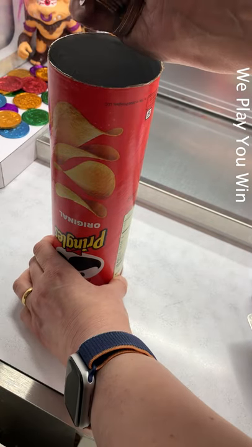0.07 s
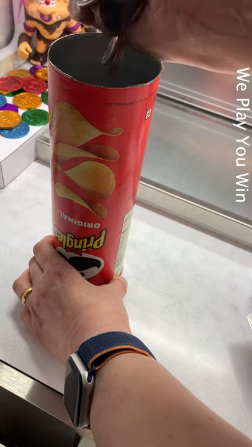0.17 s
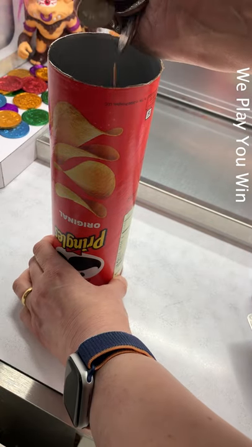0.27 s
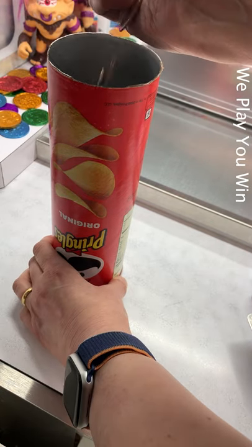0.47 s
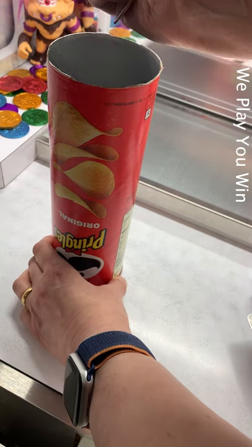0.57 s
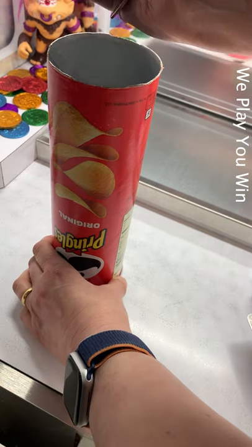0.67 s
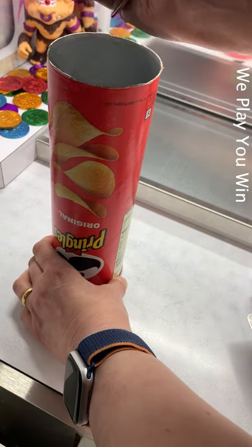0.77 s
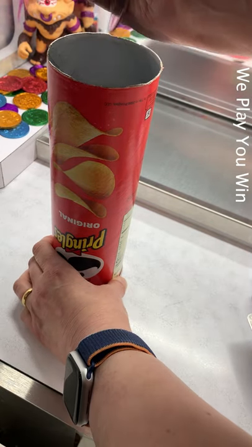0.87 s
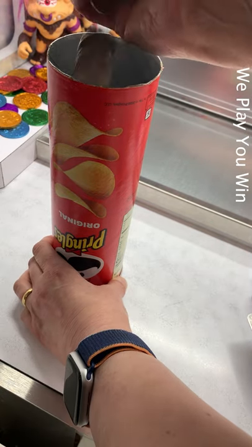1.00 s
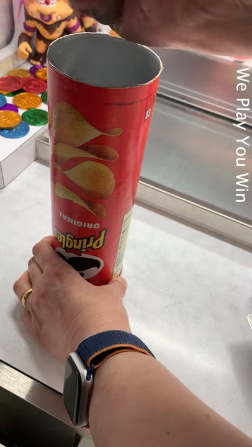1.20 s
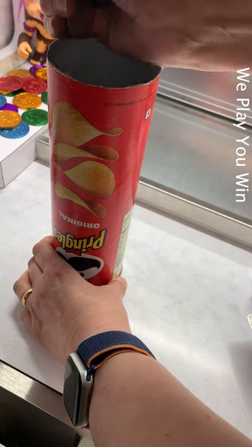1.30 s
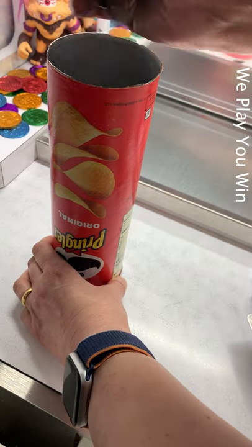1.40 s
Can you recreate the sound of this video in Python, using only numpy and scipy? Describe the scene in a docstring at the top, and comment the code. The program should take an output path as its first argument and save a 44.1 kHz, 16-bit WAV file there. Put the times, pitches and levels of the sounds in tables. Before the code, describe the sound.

Metal coins slide from a cup and pour into a tall cardboard can, jingling brightly and battering its metal base. After a brief pause, a second, duller handful clatters onto the heap. Close by, indoors, over a faint hum.

```python
"""Coins poured from a cup into a tall cardboard can with a metal base, held on a counter.
Faint hum throughout. Coins scuff, tick and slide in the cup; from 0.25 s they clink and ring in their
bending modes as they stream out. From 0.34 s they batter the base and excite the can's resonances.
The can is nudged on the counter. At 0.79 s the stream stops dead: the heap damps the ringing.
Short pause, one thin tick. From 0.98 s a second, duller handful clatters in and sounds the hollow tube."""
import sys
import numpy as np
from scipy import signal
from scipy.fft import rfft, irfft, next_fast_len
from scipy.io import wavfile
from scipy.ndimage import uniform_filter1d, minimum_filter1d

SR = 44100
rng = np.random.default_rng(int(sys.argv[2]) if len(sys.argv) > 2 else 0)


def inscribe(sig):
    """Save sig as 16-bit PCM at rate SR to the path in sys.argv[1].

    A 1-D sig is mono; a 2-D sig holds one channel per row.
    Samples are clipped to [-1, 1] before scaling.
    """
    pcm = np.round(np.clip(np.atleast_2d(sig).T, -1, 1) * 32767)
    wavfile.write(sys.argv[1], SR, pcm.astype(np.int16))


N = 63945
T = np.arange(N) / SR

# Table levels are relative. Spectra are normalised in colour().
# machine hum lines [f/Hz, level/dB]
HUM_LINES = [(97, -80.5), (161, -72.5), (275, -65.5), (555, -70.5)]
# spectra of room noise and of the hand on the cup [f/Hz, level/dB]
AIR_SPECTRUM = [(30, -21), (65, -25), (130, -6), (350, -0.5), (650, -9.5), (1200, -14),
                (4000, -31), (15000, -36)]
HAND_SPECTRUM = [(25, -13), (80, 12), (200, -1), (700, -17), (3500, -9.5), (15000, -54)]

# loose coins scuff in the cup [t/s, level/dB]
SCUFFS = [(0.0225, -41), (0.0645, -35.5)]
# light ticks in the cup [t/s, level/dB]
TICKS = [(0.0222, -49.5), (0.0645, -34), (0.1335, -17.5), (0.157, -18), (0.1815, -25), (0.199, -9.5),
         (0.2285, -10), (0.244, -4), (0.270, -16.5)]
# coins slide over each other [t/s, level/dB]
SLIDE_CURVE = [(0.105, -55.5), (0.129, -49.5), (0.247, -29.5), (0.569, -30), (0.597, -63), (0.613, -21),
               (0.785, -23.5)]
# sliding contact [f/Hz, level/dB]
SLIDE_SPECTRUM = [(300, -42), (1000, -29.5), (2000, -6), (2900, -7), (4500, 2), (7300, -2.5), (9500, 2.5),
                  (12500, 2.5), (15800, -12)]
# cup rings more as coins reach its lip [t/s, level/dB]
CUP_RING_CURVE = [(0.105, -57), (0.133, -51), (0.295, -45.5), (0.315, -37), (0.335, -42), (0.39, -38)]

# ringing of the stream [t/s, level/dB]
JINGLE_CURVE = [(0.19, -51), (0.25, -25.5), (0.49, -23.5), (0.785, -18.5)]
# coin strikes coin [t/s, level/dB]
CLINKS = [(0.2511, -4), (0.2683, -10), (0.3173, -16), (0.3724, 0), (0.3818, -6.5), (0.4229, -4),
          (0.4426, -4.5), (0.4653, 2.5), (0.4792, 2), (0.5079, 2.5), (0.5226, -1), (0.5501, 0),
          (0.605, 0.5), (0.6131, 1.5), (0.6234, -14), (0.6424, 4), (0.6599, 0.5), (0.6824, 5), (0.6974, 0),
          (0.7102, -2), (0.7224, -1.5), (0.7538, -10), (0.7844, -1.5)]
# two bending modes, varying from coin to coin [f/Hz, level/dB]
COIN_MODES = [(8733, -5.5), (8775, -9), (8831, -5), (9170, -4.5), (9265, -5), (9480, -3.5), (14690, 2),
              (14880, -1.5), (15020, 5), (15092, 5.5), (15190, -2.5), (15273, -17)]

# single coins land on the base [t/s, level/dB]
LANDINGS = [(0.3395, -24), (0.3665, -19), (0.4003, -2.5), (0.4045, -6.5), (0.4335, -12.5), (0.4425, -13),
            (0.486, -6), (0.5055, -14), (0.523, -14.5), (0.5425, -8), (0.556, -12.5), (0.5885, -7.5),
            (0.628, -9), (0.647, -8.5), (0.680, -5.5), (0.7635, -12.5)]
# stream churns on the base [t/s, level/dB]
CHURN_CURVE = [(0.345, -37.5), (0.395, -38.5), (0.399, -26.5), (0.59, -27), (0.785, -28.5)]
# contact with the base [f/Hz, level/dB]
BASE_SPECTRUM = [(40, -34), (110, -6), (230, 1), (310, -6.5), (410, -2), (900, 2.5), (1600, 2.5), (3000, 3),
                 (5400, 0.5), (7500, -8), (15000, -13.5)]
# can resonances, base struck [f/Hz, base width/Hz, gain/dB]
BASE_MODES = [(111.5, 8.8, 12.5), (155.5, 15, 6.5), (224, 11, 6), (412, 25.4, 14), (554, 24, 0.5),
              (1441, 18.3, 0), (1613, 116, -2), (2880, 46, 1), (3392, 40, -0.5), (4774, 41, -2)]
# can nudged on the counter [t/s, level/dB]
BUMPS = [(0.648, -26.5), (1.145, -46.5)]

# heap shifts after the stream stops [t/s, level/dB]
SHIFT_CURVE = [(0.789, -27.5), (0.846, -37), (0.889, -75)]
# coins drop on the heap [t/s, level/dB]
DROPS = [(0.8018, -14), (0.8235, -16), (1.0024, -13.5), (1.0368, -12.5), (1.0725, -5), (1.0912, -3.5),
         (1.1325, -10.5), (1.1389, -4), (1.1767, -8), (1.2065, -14.5), (1.2755, -17), (1.3025, -12),
         (1.3974, -16), (1.4092, -14.5)]
# second handful settles: two curves, each [t/s, level/dB]
SETTLE_CURVES = [
    [(0.95, -60), (0.968, -54), (0.986, -30), (1.025, -25.5), (1.05, -28), (1.15, -26), (1.27, -34.5),
     (1.315, -28), (1.35, -53.5)],
    [(1.362, -26.5), (1.382, -32.5), (1.41, -29), (1.45, -41)],
]
# contact with the heap [f/Hz, level/dB]
HEAP_SPECTRUM = [(50, -43), (170, -21.5), (280, -6.5), (760, -6.5), (1300, -4.5), (3000, 0), (3900, 2),
                 (7000, 3), (12000, 6), (15800, 2)]
# edge-first hits on the heap [t/s, level/dB]
CRACKS = [(0.9812, -7), (1.0998, -6.5), (1.2337, -2.5), (1.2843, -10), (1.3583, -7), (1.3886, -13)]
# edge-first contact [f/Hz, level/dB]
CRACK_SPECTRUM = [(400, -23), (2770, -5), (4100, 3.5), (6000, 1), (12500, 0.5), (16000, -4.5)]
# heavy coins shake the can, both pours [t/s, level/dB]
KNOCKS = [(0.340, -15.5), (0.367, -19), (0.984, -19.5), (1.037, -31), (1.076, -17.5), (1.094, -16),
          (1.146, -33), (1.237, -15), (1.362, -19)]
# heavy contact [f/Hz, level/dB]
KNOCK_SPECTRUM = [(25, -18), (70, -12), (150, -1), (350, 1.5), (700, 0), (1050, -1.5), (1500, -7),
                  (3000, 1.5), (15000, -57)]
# can resonances, heap inside [f/Hz, base width/Hz, gain/dB]
TUBE_MODES = [(272.4, 14, 10), (397, 54, 8), (565.7, 33, 13), (985, 67, 13), (1047, 31, 14),
              (1372, 43, 9.5), (1730, 270, 1.5), (2341, 16, 6), (2610, 51, -0.5), (3440, 74, 2.5),
              (3900, 41, 6)]

CONTACT_T60_S, SIZE_SPREAD_DB = 0.0036, 5
CUP_HZ, CUP_T60_S, SLIDES_PER_S = 2356, 0.016, 900
COIN_T60_S, COIN_SPREAD_HZ, BOUNCE_S = 0.083, 82, 0.004
STOP_S, CHOKE_T60_S = 0.789, 0.025
LANDING_BAND_HZ, EXTRA_WIDTH_HZ = (1120, 10400), 12
SETTLES_PER_S, SETTLE_T60_S = 1200, 0.029
GRAZE_S, GRAZE_HIGHPASS_HZ = 0.9415, 6000
SHIMMER_BAND_HZ = (5500, 15000)
ROOM_DB, ROOM_T60_S, ROOM_DELAY_S, ROOM_LOWPASS_HZ = -17, 0.13, 0.004, 3500
LIMIT_DB, ATTACK_S, RELEASE_DB_PER_S, CUTOFF_HZ = -5, 0.0015, 598.5, 16000


def from_db(db):
    """Decibels to gain."""
    return 10 ** (np.asarray(db) / 20)


def level(curve):
    """Gain along a level curve; fast fade outside it."""
    t_s, db = np.transpose(curve)
    outside_s = np.maximum(t_s[0] - T, 0) + np.maximum(T - t_s[-1], 0)
    return from_db(np.interp(T, t_s, db) - 6000 * outside_s)


def colour(x, spectrum):
    """Minimum-phase filter, unit power gain."""
    size = 2 * next_fast_len(N)
    hz, db = np.transpose(spectrum)
    bins_hz = np.arange(size // 2 + 1) * SR / size
    gain = from_db(np.interp(np.log(bins_hz + 1), np.log(hz), db))
    cepstrum = irfft(np.log(gain / np.sqrt(np.mean(gain ** 2))))
    cepstrum[1:size // 2] *= 2
    cepstrum[size // 2 + 1:] = 0
    return irfft(rfft(x, size) * np.exp(rfft(cepstrum)))[:N]


def strikes(rows):
    """One click per row [t/s, level/dB]."""
    t_s, db = np.transpose(rows)
    clicks = np.zeros(N)
    clicks[np.clip((t_s * SR).astype(int), 0, N - 1)] = from_db(db)
    return clicks


def chatter(per_s):
    """Uneven run of small collisions, mixed sizes; rms 1."""
    gaps, signs, sizes = rng.random((3, 4000))
    at = (np.cumsum(2 * gaps) / per_s * SR).astype(int)
    sizes_db = SIZE_SPREAD_DB * np.minimum(-np.log(sizes), 3)
    heights = np.sign(signs - .5) * from_db(sizes_db)
    clicks = np.zeros(N)
    clicks[at[at < N]] = heights[at < N]
    return clicks / np.std(clicks)


def buzz(clicks, t60_s):
    """Each click becomes a dying burst of tiny contacts, energy preserved."""
    decay = from_db(-120 / (t60_s * SR))
    power = signal.lfilter([1 - decay], [1, -decay], clicks ** 2 + 1e-18)
    return np.sqrt(power) * rng.standard_normal(N)


def clatter(clicks, t60_s, tail_db):
    """Hard contact, then a tail of loose coins buzzing."""
    return buzz(clicks, CONTACT_T60_S) + from_db(tail_db) * buzz(clicks, t60_s)


def rattle(curve, per_s, t60_s, tail_db):
    """Dense collisions along a level curve."""
    collisions = clatter(chatter(per_s), t60_s, tail_db)
    return level(curve) * collisions / np.std(collisions)


def ring(clicks, hz, t60_s):
    """One damped mode; a unit click starts a unit sine."""
    radius = from_db(-60 / (t60_s * SR))
    angle = 2 * np.pi * hz / SR
    poles = [1, -2 * radius * np.cos(angle), radius ** 2]
    return signal.lfilter([0, np.sin(angle)], poles, clicks + 1e-18)


def background():
    """Machine hum, room noise, and hand rumble on the cup until the stream stops."""
    hum = sum(from_db(db) * np.sqrt(2) * np.sin(2 * np.pi * (hz * T + rng.random()))
              for hz, db in HUM_LINES)
    hand = level([(0, -64), (STOP_S, -64)]) * colour(rng.standard_normal(N), HAND_SPECTRUM)
    air = from_db(-64) * colour(rng.standard_normal(N), AIR_SPECTRUM)
    return hum + hand + air


def cup():
    """Coins scuff, tick and slide to the lip; the cup wall rings."""
    slide = from_db(0.5) * rattle(SLIDE_CURVE, SLIDES_PER_S, t60_s=0.036, tail_db=6.5)
    ticks = from_db(1) * clatter(strikes(TICKS), t60_s=0.098, tail_db=5.5)
    wall = ring(chatter(SLIDES_PER_S), CUP_HZ, CUP_T60_S)
    wall = level(CUP_RING_CURVE) * wall / np.std(wall)
    friction = buzz(strikes(SCUFFS), t60_s=0.06)
    scuffs = ring(friction, hz=4060, t60_s=0.004)
    return colour(slide + ticks, SLIDE_SPECTRUM) + wall + scuffs


def ringing_coins():
    """Bending modes: loud clinks over a jingle of lighter touches."""
    t_s = T[:SR // 8]
    modes_hz, modes_db = np.transpose(COIN_MODES)[:, :, None]
    clinks = np.zeros(N + len(t_s))
    for start_s, clink_db in CLINKS:
        detune, lag = rng.uniform(-1, 1, (2, len(modes_hz), 1))
        age_s = np.maximum(t_s - BOUNCE_S * np.abs(lag), 0)   # a clink is a few quick touches
        envelopes = from_db(clink_db + modes_db - 60 * age_s / COIN_T60_S)
        modes = envelopes * np.sin(2 * np.pi * (modes_hz + COIN_SPREAD_HZ * detune) * age_s)
        start = int(start_s * SR)
        clinks[start:start + len(t_s)] += modes.sum(axis=0)
    jingle = sum(from_db(db) * ring(chatter(per_s=700), hz, t60_s=0.07) for hz, db in COIN_MODES)
    jingle = level(JINGLE_CURVE) * jingle / np.std(jingle)
    return from_db(-19) * clinks[:N] + from_db(1.5) * jingle


def stream_on_base():
    """The stream lands and churns on the metal base."""
    landings = from_db(12) * clatter(strikes(LANDINGS), t60_s=0.034, tail_db=5.5)
    clacks = signal.sosfilt(signal.butter(1, LANDING_BAND_HZ, "band", fs=SR, output="sos"), landings)
    churn = from_db(1.5) * rattle(CHURN_CURVE, per_s=700, t60_s=0.086, tail_db=2.5)
    return can(colour(clacks + churn, BASE_SPECTRUM), BASE_MODES)


def can(x, modes):
    """Direct sound plus broad, quickly dying can resonances."""
    out = x
    for hz, width_hz, db in modes:
        radius = np.exp(-np.pi * (width_hz + EXTRA_WIDTH_HZ) / SR)
        poles = [1, -2 * radius * np.cos(2 * np.pi * hz / SR), radius ** 2]
        resonance = (1 - radius ** 2) / 2 * signal.lfilter([1, 0, -1], poles, x)
        out = out + from_db(db) * resonance
    return out


def knocks():
    """Heavy coins shake the whole can."""
    hits = from_db(1.5) * clatter(strikes(KNOCKS), t60_s=0.071, tail_db=5.5)
    return colour(hits, KNOCK_SPECTRUM)


def bumps():
    """Dull thuds of can on counter."""
    return ring(strikes(BUMPS), hz=69.5, t60_s=0.056)


def choke():
    """Gain of the stream's ringing: the heap damps it from STOP_S."""
    return from_db(-60 * np.maximum(T - STOP_S, 0) / CHOKE_T60_S)


def heap():
    """The heap shifts; more coins drop, crack edge first and settle on it."""
    drops = from_db(5) * clatter(strikes(DROPS), t60_s=0.031, tail_db=4)
    settle = from_db(-2) * sum(rattle(curve, SETTLES_PER_S, SETTLE_T60_S, tail_db=5.5)
                               for curve in SETTLE_CURVES)
    jingle = from_db(-9) * sum(level(curve) for curve in SETTLE_CURVES) * shimmer()
    shift = rattle(SHIFT_CURVE, SETTLES_PER_S, SETTLE_T60_S, tail_db=1)
    cracks = from_db(6.5) * buzz(strikes(CRACKS), t60_s=0.015)
    return colour(shift + drops + settle, HEAP_SPECTRUM) + jingle + colour(cracks, CRACK_SPECTRUM)


def graze():
    """One coin glances off another: a thin, high tick."""
    touch = buzz(strikes([(GRAZE_S, -13.5)]), t60_s=0.018)
    return signal.sosfilt(signal.butter(2, GRAZE_HIGHPASS_HZ, "high", fs=SR, output="sos"), touch)


def shimmer():
    """Coins lying on each other ring briefly at many pitches; rms 1."""
    pitches_hz = np.geomspace(*SHIMMER_BAND_HZ, 40) * rng.uniform(.98, 1.02, 40)
    ringing = sum(ring(chatter(per_s=90), hz, t60_s=0.054) for hz in pitches_hz)
    return ringing / np.std(ringing)


def room(x):
    """Faint, dull, short reverberation."""
    tail = rng.standard_normal(N) * from_db(-60 * T / ROOM_T60_S) * (T > ROOM_DELAY_S)
    tail /= np.sqrt(np.sum(tail ** 2))
    tail = signal.sosfilt(signal.butter(2, ROOM_LOWPASS_HZ, fs=SR, output="sos"), tail)
    return from_db(ROOM_DB) * signal.fftconvolve(x, tail)[:N]


def scene():
    """Both pours in the room, mono."""
    first_pour = cup() + choke() * (ringing_coins() + stream_on_base())
    coins = first_pour + graze() + can(heap() + knocks(), TUBE_MODES)
    return (coins + room(coins) + bumps() + background())[None]


def record(dry):
    """Fast peak limiter, then a steep low-pass."""
    over_db = np.maximum(20 * np.log10(np.abs(dry[0]) + 1e-9) - LIMIT_DB, 0)
    release_db = RELEASE_DB_PER_S * T
    held_db = np.maximum.accumulate(over_db + release_db) - release_db
    window = int(ATTACK_S * SR) + 1
    gain = from_db(uniform_filter1d(minimum_filter1d(-held_db, window), window))
    return signal.sosfilt(signal.ellip(12, .1, 80, CUTOFF_HZ, fs=SR, output="sos"), dry * gain)


dry = scene()
out = record(dry)
inscribe(out)
```